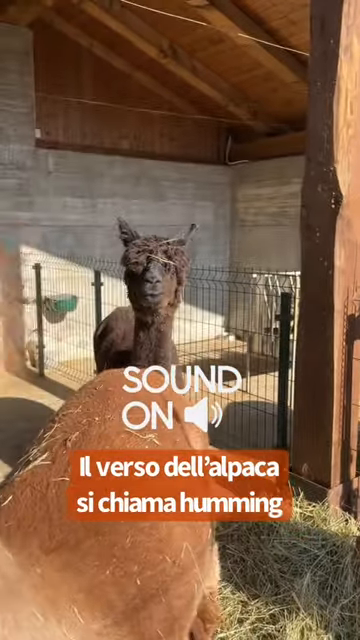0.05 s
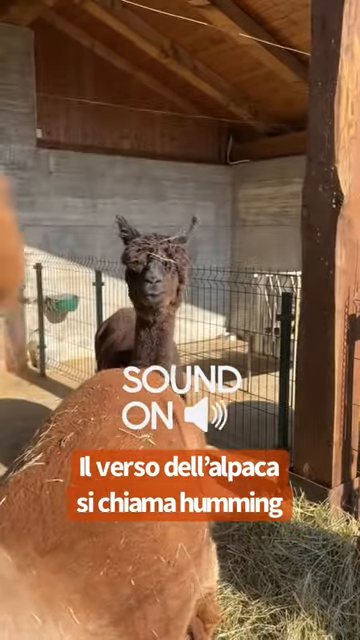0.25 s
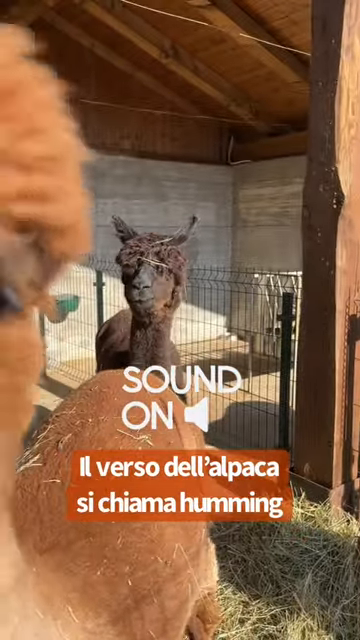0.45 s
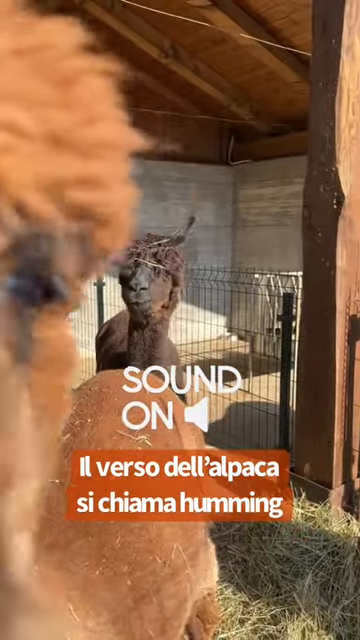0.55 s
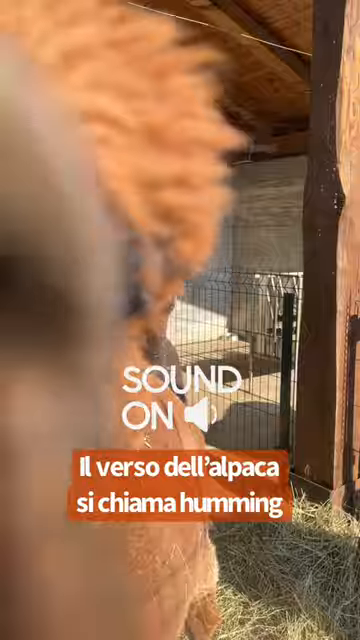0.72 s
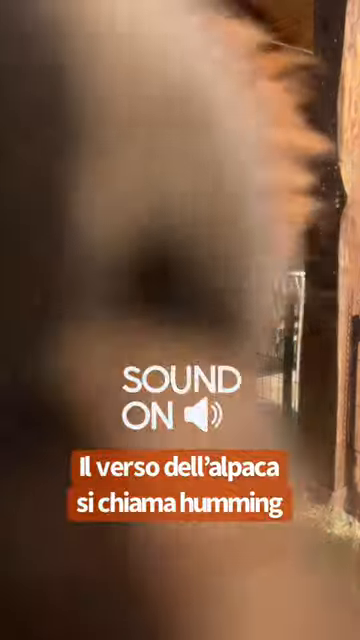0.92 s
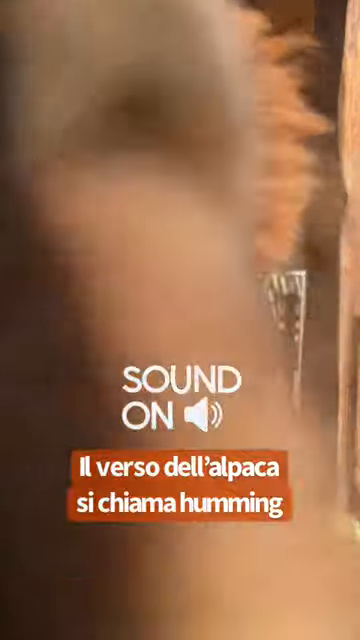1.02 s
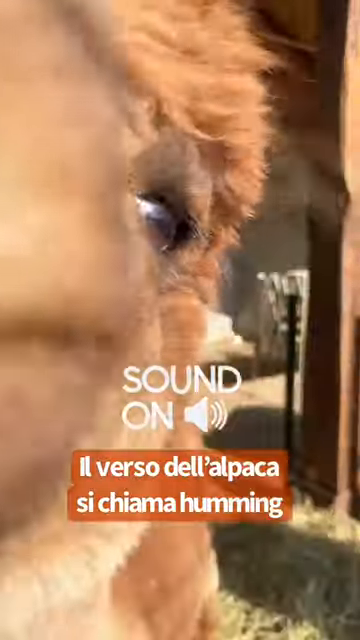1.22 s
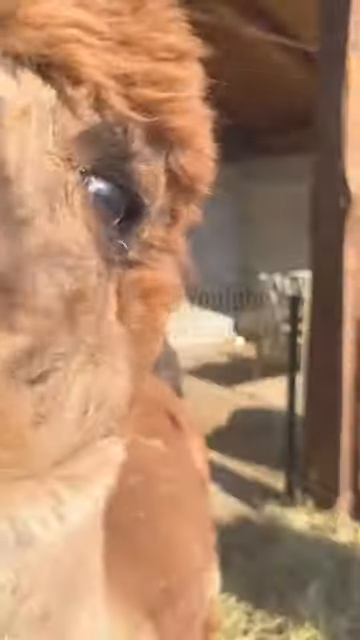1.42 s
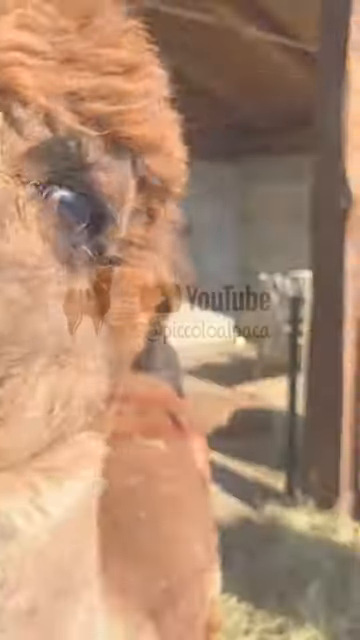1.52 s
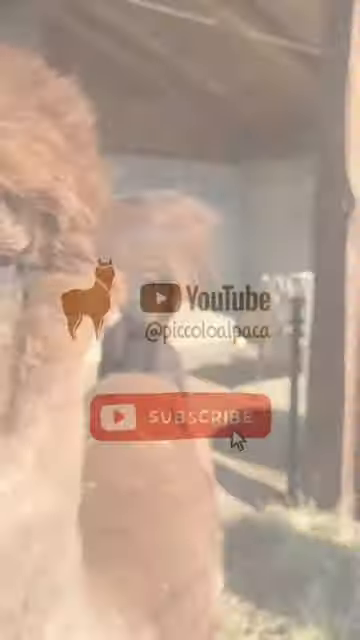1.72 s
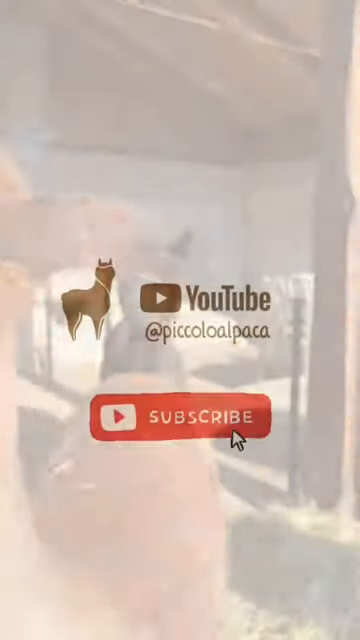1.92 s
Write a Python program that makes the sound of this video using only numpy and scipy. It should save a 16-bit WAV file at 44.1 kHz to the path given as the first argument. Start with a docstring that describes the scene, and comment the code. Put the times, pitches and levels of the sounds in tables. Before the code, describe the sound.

An alpaca gives one drawn-out nasal hum close to the microphone in a shelter. Soft thumps and rustling fleece come first, a sharp click lands near the hum's end, then a breath hisses out and faint birds chirp.

```python
"""A low rumble of air, soft thumps and rustling fleece come first, as an alpaca pushes its muzzle up to
a camera in a hay-filled shelter. It gives one nasal hum, a buzz shaped by its throat and nose, that
rises slowly and sags at the end. Its nostrils whistle briefly, and one nudge makes a sharp click.
Breath hisses out as the hum fades, and faint, far birds chirp around the last few nudges."""
import sys
import numpy as np
from scipy import signal
from scipy.fft import rfft, irfft, next_fast_len
from scipy.io import wavfile
from scipy.ndimage import map_coordinates

SR = 44100
rng = np.random.default_rng(int(sys.argv[2]) if len(sys.argv) > 2 else 0)


def put_to_file(sound):
    """Save the sound as 16-bit audio at rate SR, in the file named by the first command-line argument."""
    columns = np.atleast_2d(sound).T  # one column per channel
    safe = np.clip(columns, -1, 1)
    whole_steps = np.round(safe * 32767)
    wavfile.write(sys.argv[1], SR, whole_steps.astype(np.int16))


N = 85995


def amp(db):
    """Turn decibels into a number to multiply by."""
    return 10 ** (np.asarray(db) / 20)


def unit(x):
    """Scale a sound so its average (rms) level is 1."""
    return x / np.sqrt(np.mean(x ** 2) + 1e-20)


def clock():
    """The time of each sample, in seconds."""
    return np.arange(N) / SR


def along(points, hz):
    """Read between the rows of a (Hz, value) table, on a log frequency scale."""
    freqs, values = np.transpose(points)
    return np.interp(np.log(hz + 1), np.log(freqs + 1), values)


def curves(rows):
    """Join the dots: each column after the time becomes one value per sample."""
    times, *columns = np.transpose(rows)
    return [np.interp(clock(), times, column) for column in columns]


def wobble(rate):
    """A smooth curve through `rate` random values a second."""
    return map_coordinates(rng.standard_normal(int(N * rate / SR) + 4), [clock() * rate])


def filtered(x, response):
    """Multiply each frequency in x by response(hz)."""
    size = next_fast_len(N + SR // 2)
    return irfft(rfft(x, size) * response(np.fft.rfftfreq(size, 1 / SR)), size)[..., :N]


def ring(x, colour):
    """Pass x through a body with this (Hz, dB) tone colour."""
    size = 4096
    cepstrum = irfft(np.log(amp(along(colour, np.fft.rfftfreq(size, 1 / SR)))))
    # make the body ring only after it is struck, never before
    cepstrum[1:size // 2] *= 2
    cepstrum[size // 2 + 1:] = 0
    return signal.fftconvolve(x, irfft(np.exp(rfft(cepstrum))))[:N]


# How far the left side lags the right. Each row: frequency in Hz, lag in radians.
LEFT_LAG = [(25, -.16), (60, -.35), (200, -.62), (700, -.5), (1200, .55), (2400, -.4), (3200, 1),
            (4200, 1.36), (6000, .7), (7500, -.7), (9000, 1.46), (11000, 2.5), (15000, 2.5)]
LEFT_RIGHT = np.array([[.5], [-.5]])


def ports(x):
    """Make stereo: a near sound reaches the microphone's two openings out of step."""
    return filtered(x, lambda hz: np.exp(-1j * along(LEFT_LAG, hz) * LEFT_RIGHT))


def noise(colour, side_db):
    """Stereo noise at level 1 with a (Hz, dB) tone colour; more side_db makes it wider."""
    mid, side = filtered(rng.standard_normal((2, N)), lambda hz: amp(along(colour, hz)))
    return unit(ports(mid) + amp(side_db) * ports(side) * [[1], [-1]])


# The swells of moving air. Each row: time in seconds, level in dB.
RUMBLE_LEVEL = [(0, -66.5), (.03, -63), (.12, -79), (.2, -48.5), (.26, -61.5), (.31, -71), (.36, -44.5),
                (.45, -57.5), (.53, -65), (.6, -65.5), (.71, -60), (.85, -63.5), (1, -62), (1.08, -65),
                (1.15, -48.5), (1.24, -68), (1.45, -75), (1.57, -66), (1.7, -65), (1.77, -80.5),
                (1.95, -84)]
# Their deep tone. Each row: frequency in Hz, boost or cut in dB.
RUMBLE_TONE = [(15, -15), (35, -7), (70, 2.5), (130, -1.5), (220, -8), (350, -20.5), (550, -23),
               (1000, -48), (2000, -84)]


def air_rumble():
    """Air rumbles on the microphone as the alpaca moves."""
    level_db, = curves(RUMBLE_LEVEL)
    return amp(level_db + 2.7 * wobble(30.48)) * noise(RUMBLE_TONE, side_db=-24)


# The tone of the background. Each row: frequency in Hz, boost or cut in dB.
BACKGROUND_TONE = [(120, -59), (200, -18.5), (248, 3.5), (435, -9), (647, -5.5), (804, -10), (1490, -13),
                   (2900, -15.5), (3870, -18.5), (5450, -20), (10300, -25.5), (11400, -54), (15000, -33)]


def background(hiss_db=-75.5, whine_db=-90, whine_hz=5950, width_hz=300):
    """The quiet hiss of the place, with a narrow band of noise as a faint, high whine."""
    hiss = noise(BACKGROUND_TONE, side_db=0)
    whine = filtered(rng.standard_normal(N), lambda hz: 1 / (1 + (2 * (hz - whine_hz) / width_hz) ** 2))
    return amp(hiss_db) * hiss + amp(whine_db) * unit(whine)


# Soft pushes on the camera. Each row: start in seconds, level in dB before muffling,
# first and last pitch in Hz, then glide, rise and decay times in seconds.
PUSHES = [(.009, -57, 555, 497, .01, 0.0062, 0.0045), (.029, -55, 580, 523, 0.013, 0.0016, 0.0048),
          (0.2027, -21.5, 84.3, 68, 0.011, 0.019, 0.0088), (0.24, -51.5, 202, 152, 0.022, 0.013, 0.026),
          (0.249, -43.5, 70, 54, .018, 0.011, 0.027), (0.279, -41, 51.6, 48.3, 0.018, 0.015, 0.051),
          (0.342, -43, 99, 85, 0.023, 0.014, 0.02), (.485, -46.5, 79.5, 60.3, 0.0073, 0.011, 0.0056),
          (0.699, -37, 450, 99, 0.0027, 0.00047, 0.0061), (.986, -23.5, 605, 384, 0.0033, 0.00032, 0.0018),
          (.991, -34, 202, 95, .004, 0.0023, 0.0067), (1.041, -37, 296, 111, 0.0074, .003, 0.0064),
          (1.117, -51, 131, 79.4, .015, .012, 0.028), (1.6371, -36, 443, 87, 0.0027, 0.0045, 0.014),
          (1.6705, -31.5, 425, 85.8, 0.005, 0.0026, 0.01), (1.679, -30, 98.5, 55.6, 0.0096, 0.0087, 0.004),
          (1.703, -49, 198, 69, 0.0043, 0.0046, 0.013)]


def nudges(muffle_hz=633):
    """Each push is a few swings that drop in pitch as they die; the soft contact muffles them."""
    thumps = np.zeros(N)
    for start, db, first_hz, last_hz, glide, rise, decay in PUSHES:
        t = np.maximum(clock() - start, 0)
        cycles = last_hz * t + (first_hz - last_hz) * glide * (1 - np.exp(-t / glide))
        swell = np.sin(np.pi / 2 * np.minimum(t / rise, 1))
        fade = np.exp(-np.maximum(t - 1.1 * rise, 0) / decay)
        thumps += amp(db) * swell * fade * np.cos(2 * np.pi * cycles)
    return ports(filtered(thumps, lambda hz: 1 / (1 + (hz / muffle_hz) ** 8)))


# How long the shelter echoes. Each row: frequency in Hz, seconds to fade by 60 dB.
ECHO_TIMES = [(150, 0.18), (1500, 0.91), (8000, 0.027)]


def shelter(x):
    """The short echo from the roof and walls, made of fading noise."""
    hz, t, spectrum = signal.stft(rng.standard_normal((2, SR // 2)), SR, nperseg=256)
    fade = amp(-60 * t / along(ECHO_TIMES, hz)[:, None])
    tail = signal.istft(spectrum * fade, SR, nperseg=256)[1]
    return signal.fftconvolve(x[None], tail / np.linalg.norm(tail[0]), axes=1)[:, :N]


# Sharp ticks. Each row: start in seconds, strength in dB, extra dB for the body (below 5 kHz).
TICKS = [(0.031, -35, -9), (0.1462, -33.5, -22), (0.976, -40, -20), (.9805, -32.5, -2), (0.9853, -18.5, 9),
         (.9995, -35.5, -17), (1.036, -33.5, -23), (1.048, -35, -12)]
# A tick's lower body and bright edge. Each row: frequency in Hz, boost or cut in dB.
BODY_TONE = [(300, -17), (900, -2.5), (1700, 0.5), (2800, -11.5), (3800, -13), (4800, -31), (6000, -70)]
EDGE_TONE = [(3500, -31), (4900, -5), (5600, -8.5), (7000, -15), (8400, -2), (11000, -8.5), (12200, -14),
             (15000, -4.5)]


def clicks(crackle_db=-31, crackle_s=.0022):
    """A brief, high crackle leads into the sharp click of a hard nudge; other faint ticks come and go."""
    body, edge = np.zeros((2, N))
    t = np.arange(SR // 20) / SR
    for start, db, body_db in TICKS:
        tick = amp(crackle_db) * np.exp(-t / crackle_s) * rng.laplace(size=len(t))
        tick[0] = 1  # the sharp start
        body[round(start * SR):][:len(t)] += amp(db + body_db) * tick
        edge[round(start * SR):][:len(t)] += amp(db) * tick
    return ports(ring(body, BODY_TONE) + ring(edge, EDGE_TONE))


# Swells of rustle and hiss. Each row: peak, rise and fall times in seconds,
# then low, dull and airy levels in dB. The row at 0.98 seconds is the hiss around the click.
RUSTLES = [(0.037, 0.015, 0.045, -71.5, -64.5, -65), (.145, 0.022, 0.016, -100, -100, -73),
           (0.197, 0.023, 0.032, -56, -79, -83.5), (0.254, 0.048, 0.05, -100, -65, -65),
           (0.359, 0.023, 0.033, -62, -75, -92), (.82, 0.06, 0.15, -63, -68.5, -64.5),
           (0.98, 0.0071, 0.014, -54.5, -62, -58), (1.168, 0.11, 0.1, -59.5, -69, -70.5),
           (1.36, 0.14, 0.092, -73, -75, -72.5)]
# The tones of those three parts. Each row: frequency in Hz, boost or cut in dB.
LOW_TONE = [(80, -24), (170, -1), (310, -2.5), (430, -5.5), (600, -19), (1200, -48)]
DULL_TONE = [(300, -34), (700, 0.5), (1100, 1.5), (1600, 4), (2800, -4), (4000, -1.5), (4900, -14.5),
             (6500, -57)]
AIRY_TONE = [(3000, -4.5), (4900, -10.5), (5500, -3.5), (6500, -3.5), (8500, -6), (10300, -2), (11800, -18),
             (13800, -22), (15300, -7)]


def rustle():
    """Grainy swells as fleece brushes by, and a very short burst of hiss around the sharp click."""
    t, power = clock(), np.zeros((3, N))
    for peak, rise, fall, *levels_db in RUSTLES:
        swell = np.exp(-((t - peak) / np.where(t < peak, rise, fall)) ** 2)
        power += amp(levels_db)[:, None] ** 2 * swell
    low, dull, airy = np.sqrt(power)
    return (low * noise(LOW_TONE, side_db=-15)
            + dull * amp(2.2 * wobble(90)) * noise(DULL_TONE, side_db=-11)
            + airy * amp(2.03 * wobble(400)) * noise(AIRY_TONE, side_db=-26.5))


# The tune of the hum. Each row: time in seconds, pitch in Hz.
HUM_PITCH = [(0.38, 166.5), (0.452, 172.1), (0.548, 187.5), (0.606, 193.6), (0.786, 208.4), (0.818, 214.7),
             (0.908, 218.4), (0.978, 220.9), (1.032, 216.6), (1.05, 219.1), (1.1, 196.1), (1.16, 183.7),
             (1.2, 189.6)]
# How hoarse it is. Each row: time in seconds, roughness from 0 to 1.
HUM_ROUGHNESS = [(.36, .3), (.45, .08), (.6, .04), (.95, .03), (1.06, .07), (1.1, .18), (1.135, .5),
                 (1.2, .6)]
# Its three lowest harmonics (1, 2 and 3 times the pitch). Each row: time in seconds, three levels in dB.
HARMONIC_LEVELS = [(.35, -79, -75, -98), (.39, -54.5, -54.5, -63), (.41, -47, -56, -65),
                   (.445, -53.5, -54, -57.5), (.49, -45.5, -46.5, -57), (.525, -45, -51, -57.5),
                   (.572, -44.5, -48, -54.5), (.594, -64, -48.5, -49.5), (.63, -46, -52.5, -47.5),
                   (.7, -48, -44.5, -50.5), (.742, -44.5, -59.5, -50), (.8, -43, -48.5, -53.5),
                   (.835, -43, -45, -47.5), (.89, -42.5, -46, -53.5), (.96, -48, -47, -55.5),
                   (1.034, -48.5, -46, -53), (1.052, -45, -44, -52.5), (1.085, -40.5, -51.5, -52.5),
                   (1.13, -55, -53, -63.5), (1.18, -56.5, -63.5, -81), (1.24, -87, -95.5, -88)]


def hum(jitter=.0022, rough_jitter=.045, shimmer_db=.4, rough_shimmer_db=4.5):
    """The voice: three strong harmonics under a buzz. Pitch and level shake most at the rough ends."""
    hz, = curves(HUM_PITCH)
    rough, = curves(HUM_ROUGHNESS)
    pitch_shake = (jitter + rough_jitter * rough ** 2) * wobble(120)
    phase = 2 * np.pi * np.cumsum(hz * (1 + pitch_shake)) / SR
    low = sum(amp(db) * np.sqrt(2) * np.cos(k * phase - .94 * k * k)  # k * k smears each pulse
              for k, db in enumerate(curves(HARMONIC_LEVELS), 1))
    high = overtones(hz, phase, rough)
    sounding = np.interp(clock(), [.32, .35, 1.24, 1.28], [0, 1, 1, 0])
    level_shake = amp((shimmer_db + rough_shimmer_db * rough) * wobble(110))
    return (low + high) * sounding * level_shake


# The strength of the buzz. Each row: time in seconds, throat level in dB, nose level in dB.
BUZZ_LEVELS = [(.35, -75, -100), (.41, -69, -80), (.45, -63.5, -76.5), (.51, -57.5, -69.5),
               (0.601, -55, -64.5), (.7, -53.5, -63), (.8, -55.5, -68.5), (0.849, -55.5, -67.5),
               (.97, -57.5, -73), (1.04, -57, -72), (1.083, -54.5, -69), (1.13, -66, -85),
               (1.22, -81, -100)]
# How throat and nose ring. Each row: frequency in Hz, boost or cut in dB.
THROAT_TONE = [(450, -66.5), (620, 1), (760, 3), (890, 3), (1020, -1), (1200, 1.5), (1400, -1),
               (1590, -6.5), (1800, -3.5), (2000, -10.5), (2250, -8.5), (2700, -28), (3300, -72.5)]
NOSE_TONE = [(2000, -64), (2600, -7), (2900, -11.5), (3230, 5), (3550, -14), (4200, -11), (4800, -16.5),
             (5200, -11), (6100, -12.5), (7400, -30), (8700, -16.5), (11000, -33.5)]


def overtones(hz, phase, rough, flutter_db=2.5, flutter_radians=.035, smear_radians=.03):
    """Harmonics 4 to 65 ring in the throat and nose; roughness trades their buzz for raspy noise."""
    stretch = (hz / 200) ** .16  # the buzz's resonances rise a little with the pitch
    orders = np.arange(4, 66)
    partials = []
    for k in orders:
        gain = amp(flutter_db * wobble(16.1) + nasal_shift_db(k * hz))
        partials.append(gain * np.cos(k * phase - smear_radians * k * k + flutter_radians * k * wobble(22)))
    voice = np.zeros(N)
    for tone, db, breathiness in zip((THROAT_TONE, NOSE_TONE), curves(BUZZ_LEVELS), (1.05, 2.8)):
        buzz = unit(sum(amp(along(tone, k * hz / stretch)) * x for k, x in zip(orders, partials)))
        puffs = rng.standard_normal(N) * (1 + np.cos(phase))
        rasp = unit(ring(puffs, tone))
        rasp_share = np.clip(breathiness * rough, 0, 1)
        voice += amp(db) * (np.sqrt(1 - rasp_share) * buzz + np.sqrt(rasp_share) * rasp)
    return voice


# Nose resonances that swell or close for a moment.
# Each row: peak time in seconds, half length in seconds, centre in Hz, change in dB.
NOSE_CHANGES = [(.52, .04, 1680, 6), (.52, .05, 1430, -11), (.53, .07, 3280, -7), (.6, .06, 3080, 7),
                (.65, .04, 790, 4), (.72, .04, 3250, 3), (.735, .025, 2030, 8), (.785, .022, 1890, 8.5),
                (.72, .07, 1420, 3), (.79, .025, 3280, -7), (.85, .04, 3250, 4), (.89, .07, 2100, -5),
                (1.02, .07, 870, -6), (1.0, .08, 1320, 3), (1.08, .03, 1650, 5), (1.08, .1, 3270, -5)]


def nasal_shift_db(hz, width_hz=100):
    """An overtone grows or fades briefly as the nasal passages change shape."""
    t = clock()
    return sum(db * np.exp(-((t - peak) / half_length) ** 2 - ((hz - centre) / width_hz) ** 2)
               for peak, half_length, centre, db in NOSE_CHANGES
               if hz.min() < centre + width_hz and hz.max() > centre - width_hz)


def whistle(peak_s=.6705, half_length_s=.014, peak_db=-53.5, centre_hz=6030, rise_hz_per_s=1900):
    """The nostrils give a brief, thin, slightly rising whistle during the hum."""
    t = clock() - peak_s
    hz = centre_hz + rise_hz_per_s * np.clip(t, -.05, .05) + 28 * wobble(200)
    swell = amp(peak_db) / (1 + (t / half_length_s) ** 2)
    return swell * np.sin(2 * np.pi * np.cumsum(hz) / SR)


# The breath out as the hum ends. Each row: time in seconds, level in dB.
BREATH_LEVEL = [(1.09, -100), (1.14, -74), (1.19, -69), (1.29, -73.5), (1.43, -76), (1.52, -86),
                (1.58, -105)]
# Its thin tone. Each row: frequency in Hz, boost or cut in dB.
BREATH_TONE = [(4800, -33.5), (5600, -1), (6400, 1.5), (7000, -0.5), (7800, -13), (10000, -32.5)]


def breath():
    """Air hisses out through the nostrils, close to the microphone."""
    level_db, = curves(BREATH_LEVEL)
    return amp(level_db + 1.7 * wobble(45)) * noise(BREATH_TONE, side_db=-24)


# Faint chirps. Each row: start and length in seconds, first and last pitch in Hz, level in dB.
BIRD_NOTES = [(1.54, 0.043, 2530, 2720, -75.5), (1.598, 0.08, 2950, 3250, -83),
              (1.769, .12, 2560, 3060, -81.5)]


def birds():
    """Far birds sing rising notes, blurred by the shelter's echo."""
    notes = np.zeros(N)
    for start, length, first_hz, last_hz, db in BIRD_NOTES:
        progress = np.clip((clock() - start) / length, 0, 1)
        hz = first_hz + (last_hz - first_hz) * progress + 90 * wobble(300)
        notes += amp(db) * np.sin(np.pi * progress) * np.sin(2 * np.pi * np.cumsum(hz) / SR)
    return shelter(notes)


# Where the voice sits. Each row: frequency in Hz, left level minus right level in dB.
VOICE_LEAN = [(200, 0), (400, 0), (650, 5.5), (1250, 1.3), (2400, 1), (8000, -0.5)]


def scene(voice_echo_db=-17.5, nudge_echo_db=-22):
    """Mix the voice, a little to the left, with the nudges, their echoes and the other sounds."""
    voice = hum() + whistle()
    thumps = nudges()
    direct = filtered(ports(voice), lambda hz: amp(along(VOICE_LEAN, hz) * LEFT_RIGHT))
    echoes = amp(voice_echo_db) * shelter(voice) + amp(nudge_echo_db) * shelter(thumps.mean(axis=0))
    return (direct + echoes + thumps + clicks() + rustle()
            + breath() + birds() + air_rumble() + background())


def record(dry, top_hz=15900):
    """The camera keeps nothing above top_hz."""
    return filtered(dry, lambda hz: hz < top_hz)


dry = scene()
out = record(dry)
put_to_file(out)
```